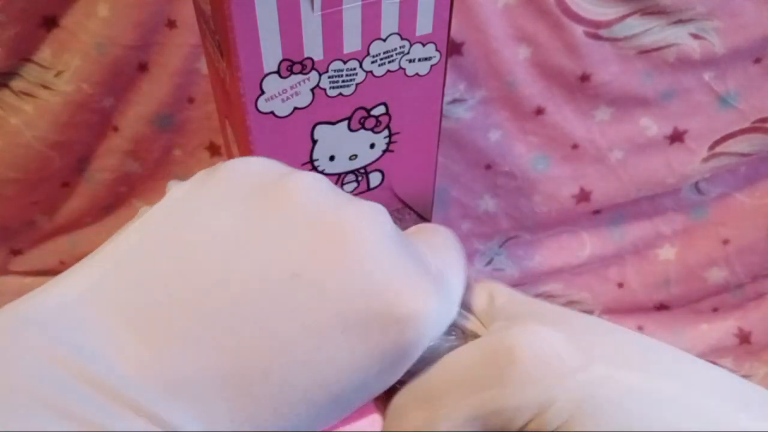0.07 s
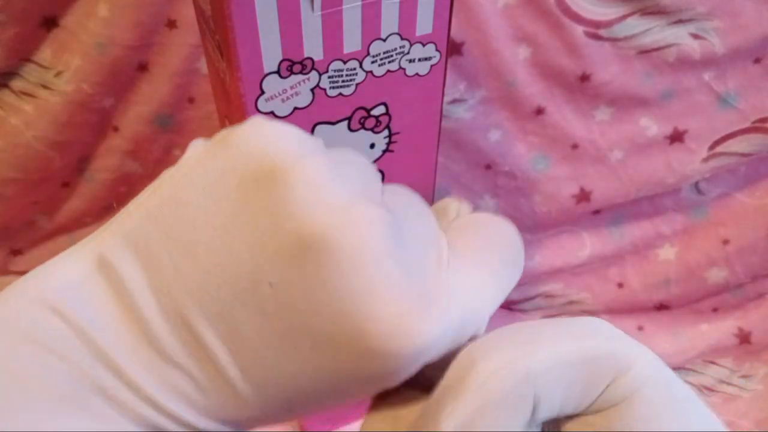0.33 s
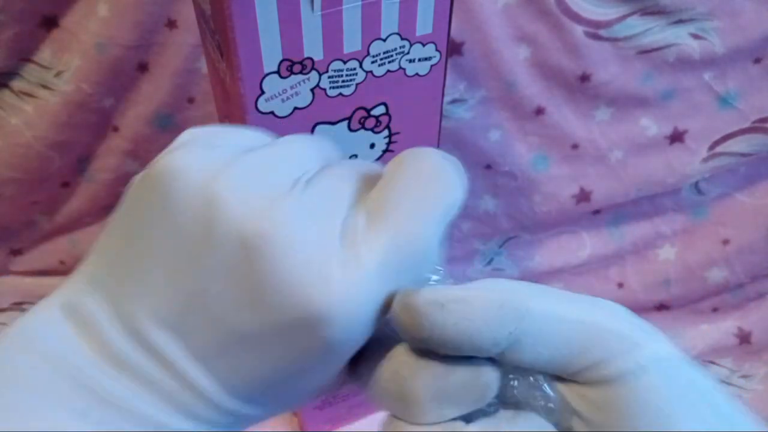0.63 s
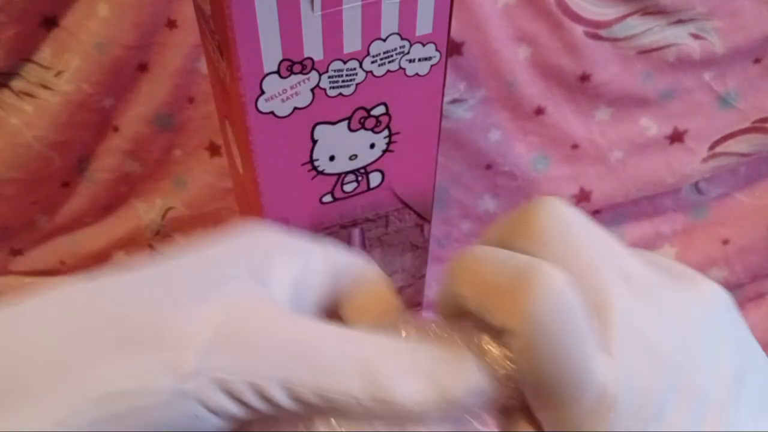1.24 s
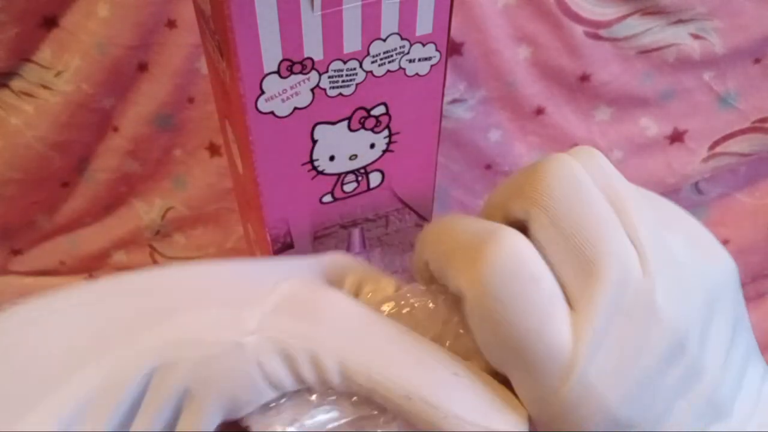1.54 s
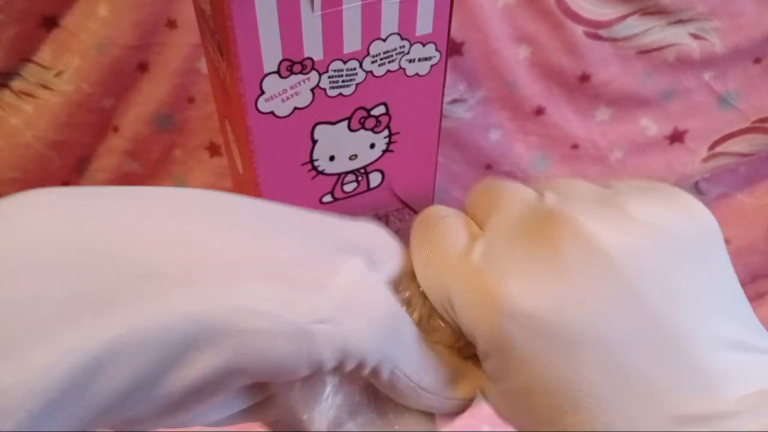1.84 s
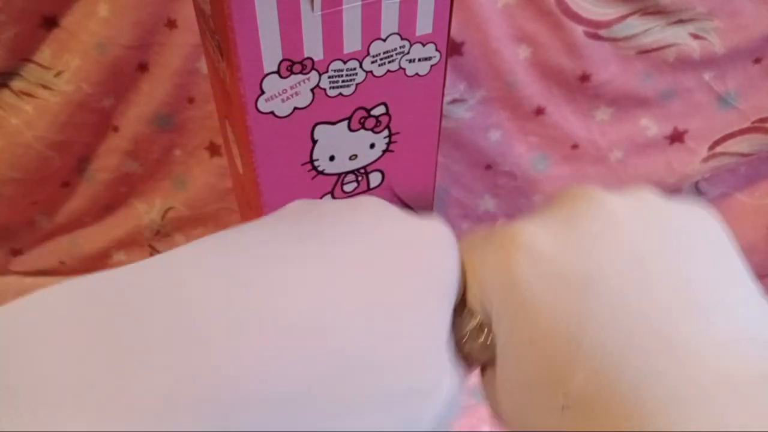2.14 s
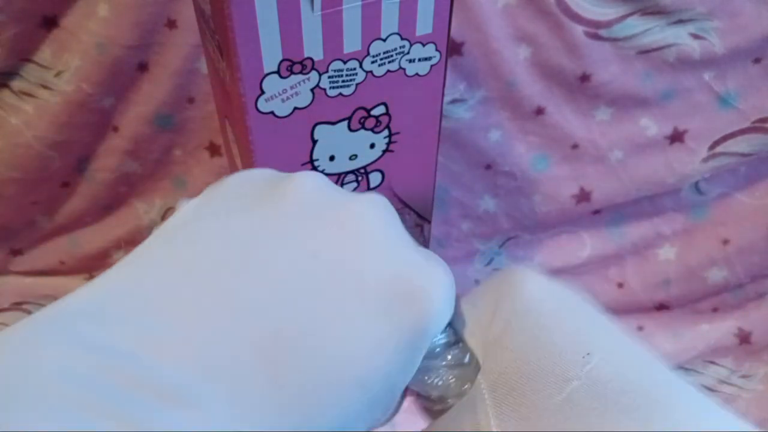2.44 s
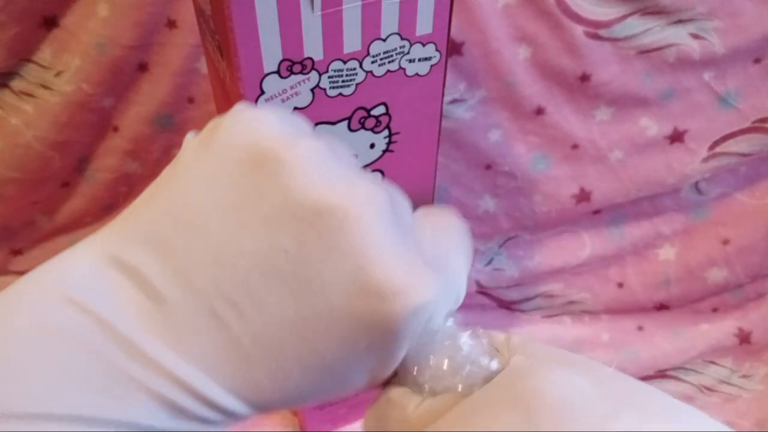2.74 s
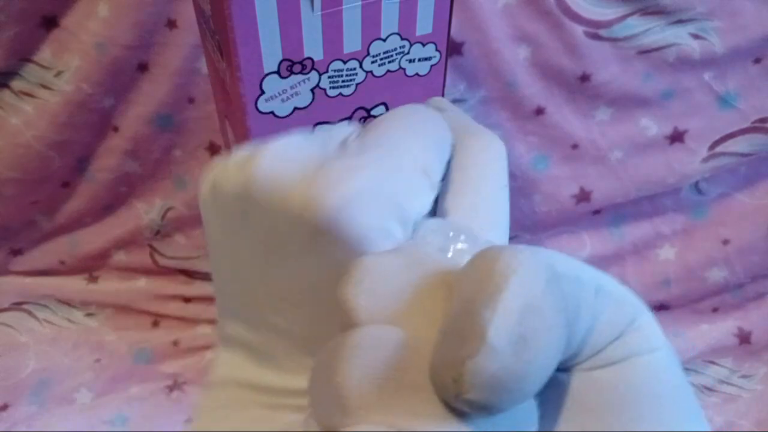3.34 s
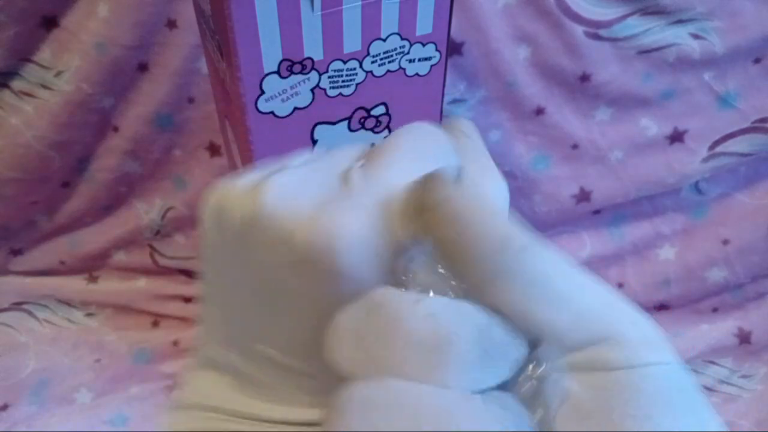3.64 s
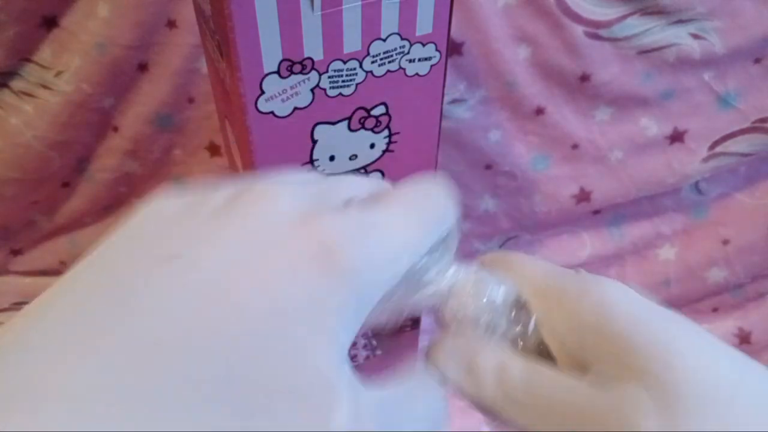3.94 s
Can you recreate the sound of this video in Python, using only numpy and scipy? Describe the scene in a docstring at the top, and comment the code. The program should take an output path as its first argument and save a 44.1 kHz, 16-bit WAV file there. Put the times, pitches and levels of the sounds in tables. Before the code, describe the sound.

Plastic wrap pops and snaps in irregular clusters as gloved hands wring it close to the microphone. Fine crackling and soft glove rubs fill the gaps, over a faint low hum in a small, quiet room.

```python
"""Wringing plastic wrap

Gloved hands wring a wad of plastic wrap close to the microphone in a small, quiet room.
Pockets and creases snap with sharp pops that bounce off nearby surfaces and then the room.
Between pops the film slides over itself in tiny crackles and the gloves rub against it.
One bursting pocket puffs out air. An appliance hums low underneath."""
import sys
import numpy as np
from scipy import signal
from scipy.fft import rfft, irfft
from scipy.io import wavfile
from scipy.ndimage import uniform_filter1d

SR = 44100
rng = np.random.default_rng(int(sys.argv[2]) if len(sys.argv) > 2 else 0)


def master(y):
    """Save y as 16-bit WAV."""
    cut = np.clip(np.atleast_2d(y).T, -1, 1)
    pcm = np.round(cut * 32767)  # scale
    wavfile.write(sys.argv[1], SR, pcm.astype(np.int16))


N = 176400
T = np.arange(N) / SR
TOP_HZ = 16500


def undb(db):
    """Turn decibels into a volume multiplier."""
    return 10 ** (np.asarray(db) / 20)


def unit(x):
    """Scale to an average strength (rms) of 1."""
    return x / np.sqrt(np.mean(x ** 2))


def peak(x):
    """Scale to a peak of 1."""
    return x / abs(x).max()


def burst(envelope):
    """Noise that follows a loudness shape, with total energy 1."""
    x = rng.standard_normal(len(envelope)) * envelope
    return x / np.sqrt(np.sum(x ** 2))


def conv(x, response):
    """Pass a sound through an echo or filter, keeping its length."""
    return signal.fftconvolve(x, response)[:len(x)]


def colour(x, points, size=4096):
    """Turn pitches up or down along a curve of (Hz, dB) points."""
    hz, db = np.array(points).T
    freqs = np.maximum(np.fft.rfftfreq(size, 1 / SR), 1)
    gains = undb(np.interp(np.log(freqs), np.log(hz), db))
    cepstrum = irfft(np.log(gains))
    cepstrum[1:size // 2] *= 2  # folded so the filter never rings before the sound
    cepstrum[size // 2 + 1:] = 0
    return conv(x, irfft(np.exp(rfft(cepstrum))))


def ring(x, hz, damping):
    """Ring at one pitch; more damping stops it sooner."""
    angle = 2 * np.pi * hz / SR
    width = np.sin(angle) * damping / 2
    return signal.lfilter([width, 0, -width], [1 + width, -2 * np.cos(angle), 1 - width], x + 1e-18)


def lowpass(x, hz, order=4):
    """Smoothly cut the treble."""
    return signal.sosfilt(signal.butter(order, min(hz, TOP_HZ), fs=SR, output="sos"), x + 1e-18)


def wander(per_second):
    """A smooth random drift of typical size 1."""
    hold = int(SR / per_second)
    steps = np.repeat(rng.standard_normal(N // hold + 1), hold)
    return unit(uniform_filter1d(uniform_filter1d(steps, hold), hold)[:N])


def add(out, x, start_s):
    """Mix a sound in at a given time."""
    start = max(int(start_s * SR), 0)
    out[start:start + len(x)] += x[:N - start]


# The appliance's tones, before the volume changes below (pitch [Hz], level [dB])
HUM_TONES = [(73.4, -68), (117.6, -58), (146, -69.5)]
# Tone of the room's air (pitch [Hz], boost [dB])
AIR_TONE = [(25, -7), (50, -8.5), (80, 11), (130, 6.5), (200, -10), (400, -12.5), (1000, -30),
            (5000, -45), (11000, -22), (16000, -42)]
# A noise suppressor's preset volume for hum and air; -53.5 means no change (time [s], level [dB])
SUPPRESSOR_VOLUME = [(0.0, -65), (0.12, -55.5), (0.17, -66.5), (0.68, -54), (1.74, -57.5), (1.94, -51),
                     (2.02, -65), (2.14, -54.5), (2.44, -58), (2.46, -70), (2.86, -61), (2.95, -85),
                     (3.01, -62), (3.13, -64.5), (3.98, -66), (4.0, -60)]
def hum_and_air(waver=0.36):
    """A noise suppressor turns the wavering hum and faint room air up and down together."""
    hum = np.zeros(N)
    for hz, db in HUM_TONES:
        strength = np.sqrt(2) * undb(db) * (1 + waver * wander(11))
        hum += strength * np.sin(2 * np.pi * hz * T + waver * wander(17))
    air = undb(-62) * unit(colour(rng.standard_normal(N), AIR_TONE))
    suppressor_db = np.interp(T, *np.array(SUPPRESSOR_VOLUME).T) + 53.5
    return (hum + air) * undb(suppressor_db)


# Tone of the room's echo (pitch [Hz], boost [dB])
ECHO_TONE = [(100, 6.5), (400, 5.5), (900, 1), (2000, 4.5), (4500, 2.5), (8000, 1.5), (15000, 4)]
def room_echo(gap_s=0.009, low_fade_s=0.052, high_fade_s=0.031):
    """A small room's blurred echo, cut short as if by a noise suppressor; the treble dies first."""
    t = T[:SR // 2]
    low = burst((t > gap_s) * np.exp(-(t / low_fade_s) ** 1.5))
    high = burst((t > gap_s) * np.exp(-(t / high_fade_s) ** 1.5))
    return colour(lowpass(low, 5800, order=1) + high - lowpass(high, 5000, order=1), ECHO_TONE)


# How the microphone hears pops, ticks and crackles (pitch [Hz], boost [dB])
MIC_TONE = [(60, -42.5), (250, -9), (600, -8), (1000, -3.5), (1350, -1.5), (2000, 5), (6500, 2.5),
            (8300, 0.5), (9500, 0), (11200, -11), (13300, -23), (15200, -3.5), (16500, -19)]
# One row per pop; the last four levels are relative to that pop (time [s], level [dB], pitch [Hz],
# damping [ratio], treble limit [Hz], cupped air [dB], bright tick [dB], crumple [dB], room echo [dB])
POPS = [(0.0169, -11.5, 2870, 2.7, 6500, -16, -30, -18, -13.5),
        (0.1586, -11.5, 3080, 2.5, 6360, -33, -36, -3, -8),
        (0.1736, -16, 4850, 1.4, 9900, -10, -21, 3.5, -12.5),
        (0.1954, -14.5, 3940, 0.85, 9300, -5, -9, 1.5, -12.5),
        (0.2423, -21, 5440, 1, 9400, -31, -20, -5, -13.5),
        (0.2725, -11.5, 2130, 1.54, 4600, -9.5, -10, -27, -15.5),
        (0.3859, -18, 3460, 2.1, 8900, -4.5, -29, -1, -13.5),
        (0.3886, -12.5, 2400, 1.7, 7800, -17.5, -19, -36, -12.5),
        (0.4775, -24.5, 1940, 0.13, 3500, -31, -22, -22, -17),
        (0.495, -28.5, 4300, 0.53, 9200, -35, 7, -26, -19),
        (0.655, -20, 3190, 0.16, 10100, -30, -14, -7, -9.5),
        (0.6651, -15.5, 5200, 0.29, 9150, -38, -28, -1.5, -10),
        (0.6751, -23.5, 4320, 0.69, 9100, -41, -18, 1.5, -3.5),
        (0.7211, -26, 2880, 0.41, 8000, -33, -18, -18, -2),
        (0.848, -17.5, 4430, 0.35, 10300, -49, 0, -3.5, -10.5),
        (0.8608, -21.5, 4160, 0.32, 9600, -19.5, -14, -5, -23),
        (0.9625, -19, 5940, 1.2, 15100, -26, 11, -4, -32),
        (1.7716, -27, 2900, 0.54, 11300, -22.5, -3, 6.5, -2),
        (1.7935, -32, 5900, 0.2, 10000, -37, -15, 4, -15),
        (1.9950, -13, 3000, 1.8, 6020, -12, -29, -28, -13.5),
        (2.0433, -14, 1940, 1.9, 7460, -11, -20, -1, -12),
        (2.3501, -18.5, 2750, 0.53, 4580, 5.5, -19, 0, -17.5),
        (2.4545, -9.5, 3740, 1.25, 8070, -28, -15, -3.5, -11),
        (2.5070, -11.5, 5400, 0.84, 7820, -11.5, -14, -2, -5.5),
        (2.6019, -20, 2940, 0.19, 3500, 12, -11, 2.5, -17),
        (2.6392, -33, 5030, .7, 10000, -25, -3, -4, -20),
        (2.6524, -11.5, 3990, 0.84, 7500, -9, -32.5, -3, -18),
        (2.8873, -12.5, 4300, 1.6, 7760, -15.5, -30, -20, -11.5),
        (2.9015, -16, 2200, 2.2, 9000, -9, -36, 0.5, -11),
        (2.9298, -8.5, 3440, 1.5, 6940, -15.5, -19, -28, -28),
        (2.9349, -25, 3950, 0.52, 7750, -2.5, -18, -6, -22),
        (3.0122, -6.5, 3520, 2.46, 9400, -24, -14, -12.5, -12),
        (3.1226, -21, 1760, .7, 3760, -17.5, -17, -10, -12.5),
        (3.1286, -8.5, 4000, 1, 7400, -15.5, -14, -12, -11),
        (3.2878, -14.5, 2600, 0.96, 7900, -8, -3, -8.5, -15),
        (3.3169, -14, 2500, 2.7, 5560, -9, -35, -32, -20.5),
        (3.4634, -16.5, 7000, 0.4, 13200, -25, -8, 0.5, -13.5),
        (3.5232, -28, 6300, 0.33, 15100, -29, 9, -2, -28),
        (3.5937, -21.5, 5200, 0.97, 10700, -25, -10, -21, -14),
        (3.68, -14, 5240, 0.5, 11300, -24.5, -1, 0, -11.5),
        (3.7168, -15.5, 4770, 0.54, 8900, -30, -18, -7, -8),
        (3.7598, -25.5, 3970, 0.71, 11200, -17, -14, -13, -6),
        (3.8059, -18, 8100, 0.63, 13600, -23, -29, -4.5, -16),
        (3.891, -22.5, 6950, 0.33, 10800, -33, -16, -2.5, -22),
        (3.9202, -27, 3860, 0.71, 8900, -23, -17, -16, -2.5)]
def pops(bounce_s=0.0010687, scatter_fade_s=0.0018, crumple_fade_s=0.0013):
    """Each snap kicks the film and the air cupped in the hands, then echoes near and far."""
    out, t = np.zeros(N), T[:SR // 2]
    kick = 1. * (t == 0)
    since_bounce = t - bounce_s
    tick = colour(peak(ring(kick, hz=13500, damping=0.23)), MIC_TONE)
    cupped_air = peak(lowpass(ring(kick, hz=856, damping=0.8), 1680, order=2))
    for start_s, db, hz, damping, top_hz, cupped_db, tick_db, crumple_db, room_db in POPS:
        film = peak(lowpass(ring(kick, hz, damping), top_hz))
        snap = colour(film + undb(cupped_db) * cupped_air, MIC_TONE)
        snap = snap - lowpass(snap, 223, order=1)  # small pockets give off little bass
        # The partly blocked straight path arrives just before the main bounce.
        paths = undb(-21.5) * kick + np.roll(kick, int(bounce_s * SR))
        # Sound scatters off hands, box and table, and tiny folds crumple with the pop.
        scatter = burst((since_bounce > 0.0004) * np.exp(-abs(since_bounce) / scatter_fade_s))
        crumple = burst(np.exp(-abs(since_bounce) / crumple_fade_s))
        near = conv(snap + undb(tick_db) * tick, paths + undb(-6.5) * scatter + undb(crumple_db) * crumple)
        far = undb(room_db) * conv(snap, room_echo())
        add(out, (near + far) * undb(db) / abs(snap).max(), start_s - bounce_s)
    return out


def settling_creases(ticks_per_s=22):
    """Creases keep settling with lone, faint ticks."""
    kicks = (rng.random(N) < ticks_per_s / SR) * undb(-53 + 4 * rng.standard_normal(N))
    tick = peak(ring(1. * (T[:SR // 100] == 0), hz=8000, damping=0.72))
    return colour(conv(kicks, tick), MIC_TONE)


def moving_folds(x, bands=22, swing_db=2, shifts_per_s=24):
    """As the folds move, each narrow range of pitches swells and sinks on its own."""
    log_hz = np.log(np.fft.rfftfreq(N, 1 / SR) + 1)
    place = np.interp(log_hz, np.log([600, TOP_HZ]), [0, bands - 1])
    out, spectrum = np.zeros(N), rfft(x)
    for k in range(bands):
        band = irfft(spectrum * np.maximum(1 - abs(place - k), 0), N)
        out += band * undb(swing_db * wander(shifts_per_s))
    return out


# A long twist, then a short squeeze, before trims (time [s], middle level [dB], treble level [dB])
TWIST = [(0.34, -52.5, -61.5), (0.45, -55.5, -59), (0.52, -56, -50.5), (0.6, -58, -58.5),
         (0.64, -56.5, -47.5), (0.72, -51.5, -49.5), (0.79, -56.5, -49), (0.83, -58.0, -55),
         (0.89, -53, -57), (0.93, -54, -46.5), (1.03, -55, -50), (1.088, -42.5, -50.5), (1.12, -56, -54),
         (1.21, -63.5, -61), (1.26, -60, -53.5), (1.35, -55, -52.5), (1.39, -67, -59.5), (1.5, -58, -52.5),
         (1.58, -54, -51.5), (1.637, -56, -47), (1.658, -75, -57), (1.71, -78, -64), (1.739, -63, -51),
         (1.773, -41, -35.5), (1.81, -46.5, -47.5), (1.85, -64, -58.9), (1.94, -93, -60.5),
         (1.969, -60, -58), (2.14, -94, -77), (2.3, -66.5, -64), (2.43, -101, -91)]
SQUEEZE = [(3.42, -78, -77), (3.51, -62, -54.2), (3.545, -73, -54.5), (3.598, -49, -38.5),
           (3.65, -46.5, -51), (3.7, -54, -45), (3.76, -47.2, -45.5), (3.795, -60.5, -58),
           (3.861, -72, -59.5), (3.92, -49, -46.2), (3.96, -58.7, -66), (3.99, -67, -54)]
# Tone of the middle and the treble crackles (pitch [Hz], boost [dB])
MIDDLE_TONE = [(150, -15), (400, -12), (900, 2), (1400, -3.5), (2000, 0), (2800, -12.5), (3800, 0),
               (8000, -50)]
TREBLE_TONE = [(1500, -26), (2600, -7), (3400, -1), (6000, 0), (8000, -2), (10000, -1), (12500, -4),
               (15500, -2)]
def sliding_film(clicks_per_s=2200, spread_db=4.2, click_fade_s=0.00014, flutter_db=1.76):
    """Film sticks and slips on itself in thousands of tiny clicks, a few much stronger than the rest."""
    out = np.zeros(N)
    slips = rng.random(N) < clicks_per_s / SR
    sizes = slips * undb(spread_db * np.minimum(rng.exponential(size=N), 4))
    envelope = np.sqrt(abs(conv(sizes ** 2, np.exp(-T[:SR // 50] / click_fade_s))))
    flutter = undb(flutter_db * wander(44.94))
    for column, tone, trim_db in ((1, MIDDLE_TONE, -5), (2, TREBLE_TONE, -3)):
        clicks = colour(envelope * rng.standard_normal(N), tone)
        clicks = colour(clicks, MIC_TONE)
        clicks = unit(clicks + undb(-6.5) * conv(clicks, room_echo()))
        effort = undb(-76)  # a faint crackle stays between moves
        for move in (np.array(TWIST), np.array(SQUEEZE)):
            times = move[:, 0]
            moving = uniform_filter1d(1. * ((T > times[0]) & (T <= times[-1])), size=800)
            effort = effort + moving * undb(np.interp(T, times, move[:, column]) + trim_db)
        out += clicks * effort * flutter
    return moving_folds(out)


# One row per rub (loudest moment [s], pitch [Hz], time spread to each side [s], level [dB])
RUBS = [(0.551, 2050, 0.059, -53), (0.719, 318, .02, -66), (1.076, 1210, 0.021, -65),
        (1.638, 2050, 0.012, -48), (1.764, 927, 0.011, -65.5), (2.757, 622, 0.063, -71.5),
        (3.619, 455, 0.0056, -50.5), (3.65, 565, 0.0094, -57), (3.655, 796, 0.024, -80),
        (3.696, 477, 0.013, -59), (3.772, 905, 0.0047, -61)]
def glove_rubs():
    """Rubber gloves drag on the film in short, dull rubs."""
    out = np.zeros(N)
    for middle_s, hz, spread_s, db in RUBS:
        friction = ring(rng.standard_normal(N), hz, damping=0.51)
        friction = unit(ring(friction, hz, damping=0.62))
        out += friction * undb(db) * np.exp(-((T - middle_s) / spread_s) ** 2 / 2)
    return out


def air_puff(start_s=3.0125, hz=152, fade_s=0.0017):
    """Air from a burst pocket thumps the microphone."""
    t = np.maximum(T - start_s, 0)
    puff = undb(-25) * np.sin(2 * np.pi * hz * t) * np.exp(-t / fade_s)
    return puff - lowpass(puff, 104, order=1)


def scene():
    """All the sounds meet at one microphone."""
    wringing = pops() + settling_creases() + sliding_film() + glove_rubs() + air_puff()
    return (wringing + hum_and_air())[None]


def record(dry, quiet_db=-80, duck_db=-5):
    """A noise suppressor turns down weak pitches, shortening echoes; then the top treble is cut."""
    bands = signal.stft(dry, nperseg=512)[2]
    power = uniform_filter1d(abs(bands) ** 2, size=3, axis=-1)  # smooth over time
    power = uniform_filter1d(power, size=3, axis=-2)  # and over pitch
    opening = power ** 2 / (power ** 2 + undb(quiet_db) ** 4)  # 0 when weak, 1 when strong
    cleaned = signal.istft(bands * undb(duck_db * (1 - opening)))[1][:, :N]
    return signal.sosfilt(signal.ellip(8, .2, 70, TOP_HZ, fs=SR, output="sos"), cleaned)


dry = scene()
out = record(dry)
master(out)
```